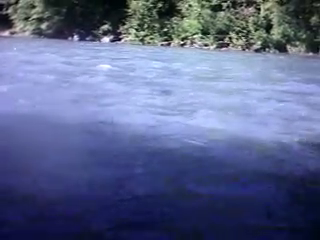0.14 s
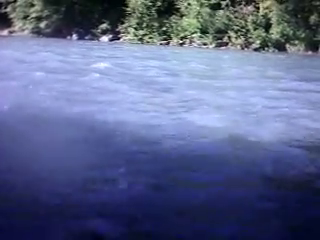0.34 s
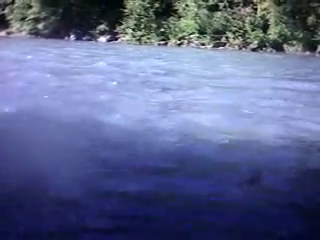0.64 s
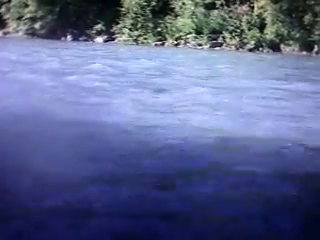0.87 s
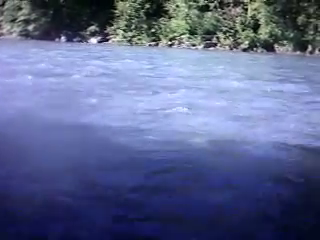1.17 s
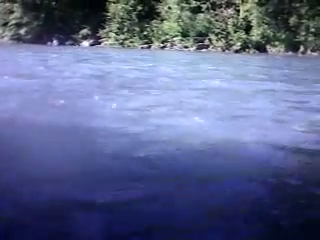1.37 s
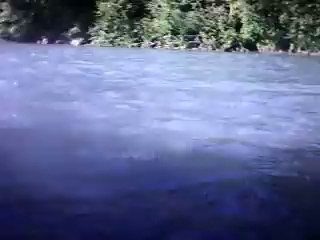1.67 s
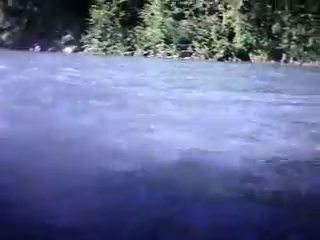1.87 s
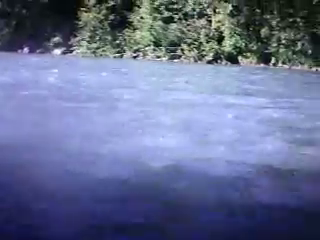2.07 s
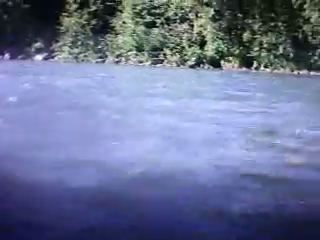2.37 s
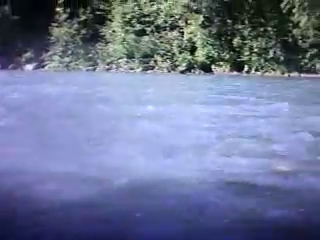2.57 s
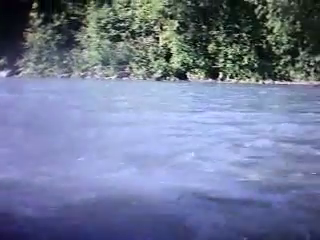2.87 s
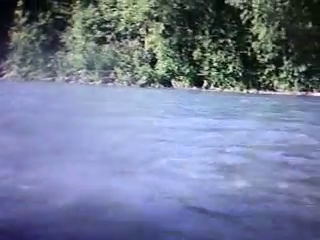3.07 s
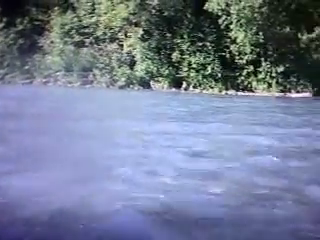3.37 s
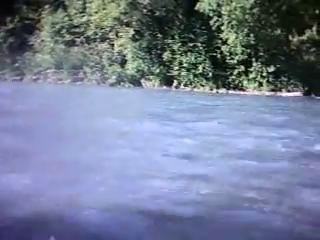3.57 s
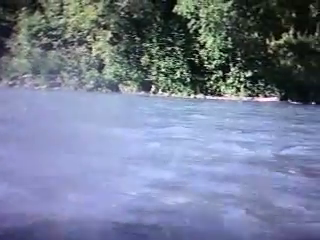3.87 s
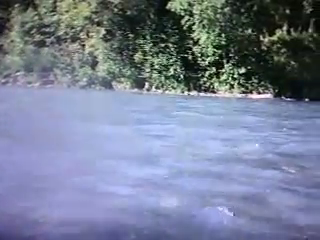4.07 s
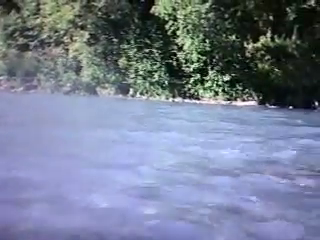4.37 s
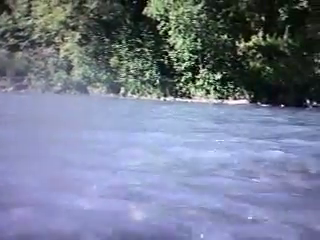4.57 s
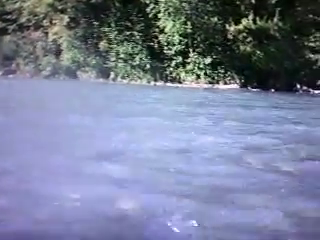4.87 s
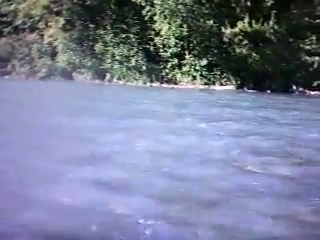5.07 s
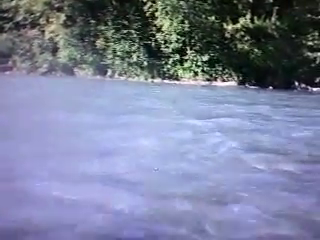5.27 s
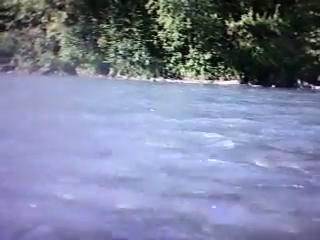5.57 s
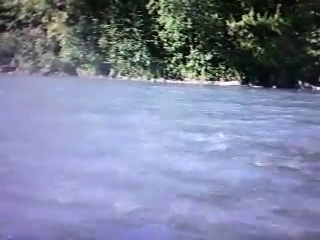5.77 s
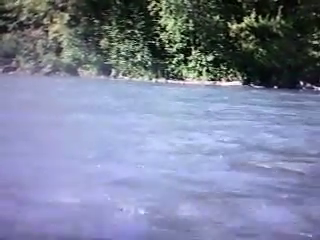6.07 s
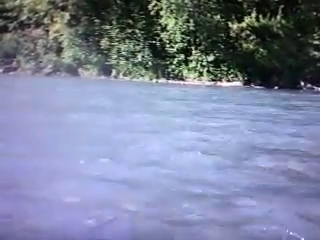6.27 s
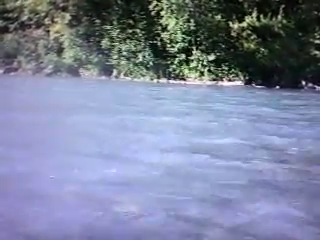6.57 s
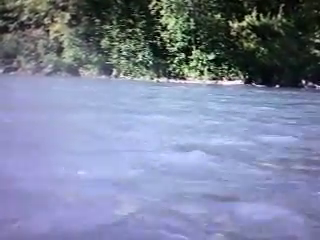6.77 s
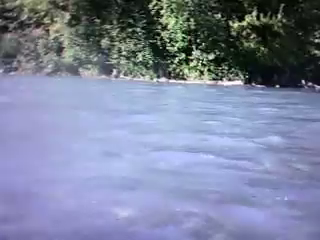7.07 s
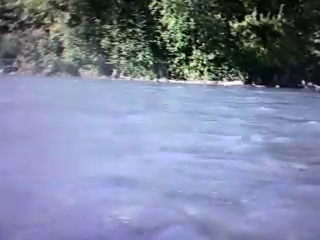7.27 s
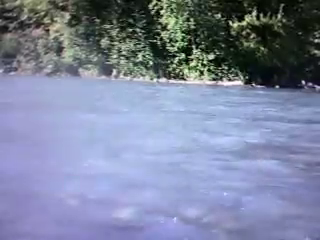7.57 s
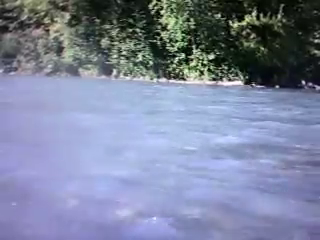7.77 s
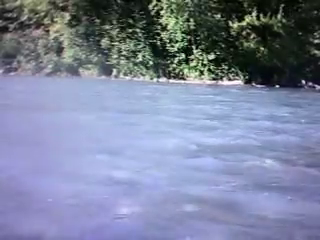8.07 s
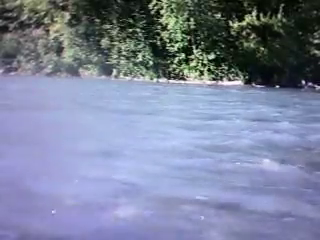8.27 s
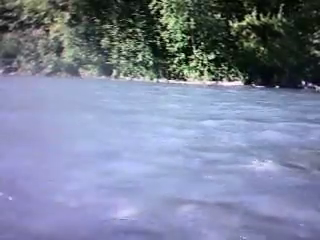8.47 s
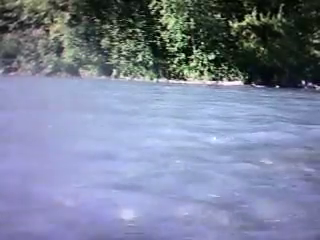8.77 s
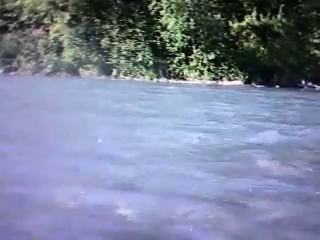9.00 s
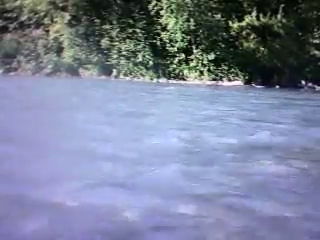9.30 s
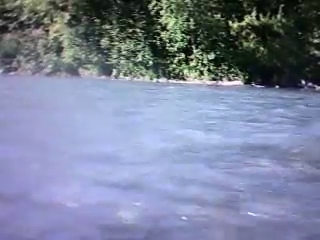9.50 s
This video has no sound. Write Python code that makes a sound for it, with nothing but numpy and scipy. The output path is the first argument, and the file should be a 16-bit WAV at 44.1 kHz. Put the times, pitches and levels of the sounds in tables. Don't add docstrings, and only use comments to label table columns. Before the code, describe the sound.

Heard from inside a closed plastic case strapped to a quad bike in a river: throttle blips make a coarse, overloaded low buzz and machine-gun rattle, broken by sharp knocks. Near five seconds the throttle shuts and the engine drops to a slow, thudding idle, with a few soft hollow bumps and faint muffled water hiss. Dull, narrow-band sound.

```python
import sys
import numpy as np
from scipy import signal
from scipy.fft import rfft, irfft
from scipy.io import wavfile
from scipy.ndimage import uniform_filter1d

SR = 44100
rng = np.random.default_rng(int(sys.argv[2]) if len(sys.argv) > 2 else 0)


def int16_out(signal):
    q = np.round(np.clip(np.atleast_2d(signal).T, -1, 1) * 32767)
    wavfile.write(sys.argv[1], SR, q.astype(np.int16))


def natural_amplitude(level_db):
    exponent = np.asarray(level_db, float) / 20
    return 10 ** exponent


N = 425124

# opens t/s, closes t/s, rattle level/dB, mount buzz reached f/Hz
THROTTLE_BLIPS = [(-0.2, 0.222, -18, 77.3), (0.584, 0.776, -29.5, 68.9), (1.083, 1.445, -18.5, 76.8),
                  (1.462, 1.472, -18, 72), (1.735, 2.032, -17.5, 76.62), (2.03, 2.199, -26.5, 80.53),
                  (2.199, 2.408, -22.5, 76.33), (2.528, 2.7, -20, 79.5), (2.7, 2.82, -25.5, 72.18),
                  (3.088, 3.206, -15.5, 74.17), (3.376, 3.41, -23.5, 67.25), (3.518, 3.581, -30.5, 67.15),
                  (3.59, 4.359, -18.5, 80.2), (4.357, 4.462, -17.5, 86.03), (4.46, 4.6, -22.5, 79.06),
                  (4.597, 4.709, -20, 67.95), (4.71, 4.755, -29, 64.32)]
# t/s, firing rate f/Hz
IDLE_DRIFT = [(5.4, 11.0), (5.84, 11.2), (6.26, 10.78), (6.7, 10.8), (7.1, 10.55), (7.52, 10.93),
              (8.36, 10.83), (9.2, 10.78), (9.64, 10.9)]
# t/s, frame level/dB, ringing case level/dB
ENGINE_LEVELS = [
    (0.0, -23.5, -30.5),
    (3.5, -20.5, -31.5),
    (4.7, -21.5, -25.5),
    (5.0, -27.5, -36.5),
    (5.45, -27.5, -38),
    (6.0, -31.5, -42),
    (7.7, -32.5, -44),
    (8.3, -31.5, -41),
    (9.64, -33, -40),
]
# multiple of the idle firing rate, level/dB
FIRING_HARMONICS = [(1, -40), (2, -26), (3, -4), (4, -11.5), (5, 4), (6, -5.5), (7, -12.5), (8, 0.5),
                    (9, -6.5), (10, -14), (11, -2), (12, -7.5), (13, -12), (14, -13.5), (15, -15),
                    (16, -30), (17, -13), (18, -17), (19, -23), (20, -17.5), (21, -17.5), (22, -25),
                    (23, -16), (24, -18.5)]
# f/Hz, width f/Hz, level/dB
FRAME_MODES = [(39.2, 1.8, 8.5), (54.8, 5, 6.5), (87, 15, -2.5), (123.5, 16, -6.5), (151, 24, -16.5),
               (201, 16, -21.5), (238, 15, -21)]
# f/Hz, width f/Hz, level/dB
CASE_MODES = [(254, 114, -2), (423, 165, -5.5), (519, 140, -7.5), (704, 40, -42), (781.5, 83, 5),
              (903, 61, -10.5), (1008, 52, 3), (1107, 117, 4), (1180.6, 88, -2.5), (1278, 90, -45),
              (1410, 61, -37.5), (1557, 66, -11)]
# f/Hz, width f/Hz, level/dB
TAPPED_MODES = [(1186, 110, 1.5), (1562, 68, -11.5)]
# f/Hz, width f/Hz, level/dB
STRUCK_MODES = [(798, 45, -18.5), (939, 130, -8), (1107.5, 118, 1.5), (1288, 34, -12.5), (1440, 145, -14)]
# f/Hz, width f/Hz, level/dB
EDGE_MODES = [(2125, 227, -1.5), (3640, 6600, -8.5)]
# f/Hz, width f/Hz, level/dB
LID_MODES = [(318, 104, -0.5), (624, 680, -2)]
# f/Hz, width f/Hz, level/dB
BRACKET_MODES = [(2350, 5, -9), (3150, 9, -14)]
# f/Hz, level per Hz/dB
RIVER_COLOUR = [(700, -24.5), (1500, 6), (1900, -8), (2600, -7), (3400, -13.5), (4200, -11.5)]
# t/s, edge level/dB, ring level/dB
CASE_KNOCKS = [(0.2826, -17, -6.5), (0.3412, 3, -7.5), (0.4666, -14, -6.5), (0.5317, 7.5, -2.5),
               (0.5899, -24, -1), (0.649, 13.5, 6), (0.7681, -6, -3), (0.819, -8, -1), (0.8615, -24, -10.5),
               (0.9447, -17, 0), (1.0127, -16, -9), (1.0325, 3, -6.5), (1.0683, -21, 2), (1.49, -13, -4),
               (1.5142, -25, -14.5), (1.5926, -15.5, -0.5), (1.6082, 3, -6.5), (1.734, -6, -7),
               (2.4698, -20, -12), (2.4972, -13, 5.5), (2.9637, -10, -17), (3.0277, -21, -4.5),
               (3.0546, -28, 1), (3.2565, -14, 1), (3.323, 6.5, -4), (3.4434, 1, -7),
               (5.3651, -16.5, -21.5), (5.706, 0, 2), (5.7334, -14, -13), (8.719, -25, -16)]
# t/s, upper modes level/dB, lower modes level/dB
MOUNT_BUMPS = [(4.8348, -5.5, -15), (4.8655, -27, -19), (4.9873, -11.5, -15.5), (5.0498, -21, -16),
               (5.1433, -19.5, -18.5), (5.2899, -12, -14), (5.3731, -7.5, -13.5), (5.393, -14, -12.5),
               (5.5468, -28, -29), (5.6997, 8.5, -7.5), (5.7092, 1, -27), (5.7244, 1, -12),
               (5.7394, -5.5, -19), (7.5088, -18, -36), (7.7715, -12.5, -15.5), (8.0313, -18.5, -25.5),
               (8.334, -18, -23), (8.3526, -14, -19.5), (8.7124, 5.5, -10), (8.7235, -20, -17),
               (8.7538, -14, -16.5), (9.0468, -20, -23), (9.0764, -27, -28)]

COAST_HZ, IDLE_HZ = 64.89, 10.82
BUZZ_ORDER = 4
LOOSE_DB, SHUT_DB = -33, -40
THROTTLE_FIRE_S, IDLE_FIRE_S = 3.957, 6.857
FULL_SCALE = .715


def curves(table):
    s, *columns = np.transpose(table)
    return [np.interp(np.arange(N) / SR, s, c) for c in columns]


def level(x, db):
    return x * natural_amplitude(db) / np.sqrt(np.mean(x ** 2))


def lag(x, seconds):
    keep = np.exp(-1 / (seconds * SR))
    return signal.lfilter([1 - keep], [1, -keep], x - x[0]) + x[0]


def walk(rate):
    hold = int(SR / rate)
    steps = np.repeat(rng.standard_normal(N // hold + 1), hold)
    return 1.3 * uniform_filter1d(steps, hold)[:N]


def ring(x, modes):
    return sum(natural_amplitude(db) * signal.lfilter(*signal.iirpeak(hz, hz / width, SR), x) for hz, width, db in modes)


def case(x, modes=CASE_MODES):
    return sum(ring(ring(x, [(hz, width, 0)]), [(hz, width, db)]) for hz, width, db in modes)


def bursts(starts, sizes, seconds):
    clicks = np.zeros(N)
    clicks[starts] = sizes
    return signal.lfilter([1], [1, -np.exp(-1 / (seconds * SR))], clicks) * rng.standard_normal(N)


def throttle():
    t = np.arange(N) / SR
    buzz_hz, rattle_db = np.full(N, 1. * COAST_HZ), np.full(N, 1. * SHUT_DB)
    for opens, closes, db, top_hz in THROTTLE_BLIPS:
        buzz_hz[max(int(opens * SR), 0):int(closes * SR)] = top_hz
        corners = [opens - 0.01, opens, closes, closes + 0.006, closes + 0.11]
        rattle_db = np.maximum(rattle_db, np.interp(t, corners, [SHUT_DB, db, db, LOOSE_DB, SHUT_DB]))
    settle_s, flywheel_s = 0.22, 0.045
    driving = np.exp(-np.maximum(t - THROTTLE_BLIPS[-1][1], 0) / settle_s)
    idle_hz, = curves(IDLE_DRIFT)
    driven_hz = lag(buzz_hz, flywheel_s) / BUZZ_ORDER
    return idle_hz + driving * (driven_hz - idle_hz), rattle_db


def engine(hz):
    frame_db, case_db = curves(ENGINE_LEVELS)
    turns = np.cumsum(hz) / SR
    turns -= turns[int(IDLE_FIRE_S * SR)]
    start = rng.random(len(FIRING_HARMONICS))
    order, order_db = np.transpose(FIRING_HARMONICS)

    def passed(k):
        db = np.interp(k * hz[::16] / IDLE_HZ, order, order_db) + walk(11)[::16]
        return np.repeat(natural_amplitude(db), 16)[:N]

    beat = sum(passed(k) * np.sin(2 * np.pi * (k * turns + p)) for k, p in zip(order, start))
    slosh = ring(natural_amplitude(1.8 * walk(12)) * rng.standard_normal(N), FRAME_MODES)
    slosh = signal.sosfilt(signal.butter(4, 300, fs=SR, output="sos"), slosh)
    frame = level(beat, -1.5) + level(slosh, -5.5)
    throb = 1 + 0.8 * np.exp(3.5 * (np.cos(2 * np.pi * (turns - .05)) - 1))
    shake = case(throb * natural_amplitude(1.5 * walk(70)) * rng.standard_normal(N))
    fires = np.flatnonzero(np.diff(np.floor(turns)))
    taps = bursts(fires, natural_amplitude(rng.standard_normal(len(fires))), seconds=0.0015)
    ticks = case(taps, TAPPED_MODES)
    return natural_amplitude(frame_db + 9.0) * frame + natural_amplitude(case_db + 8.5) * (level(shake, 0) + level(ticks, -8))


def beats(hz, jitter):
    turns = np.cumsum(hz) / SR
    last = int(turns[-1])
    stretch = rng.standard_normal(last + 2)
    starts = np.searchsorted(turns, np.arange(1, last) + jitter * stretch[1:last])
    return turns, np.unique(np.clip(starts, 0, N - 1))


def strike(hits, edge, thump):
    return ring(hits, STRUCK_MODES) + ring(edge, EDGE_MODES) + ring(thump, LID_MODES) + ring(edge, BRACKET_MODES)


def mount(firing_hz, rattle_db):
    buzz_db = -15 + 0.74 * (lag(rattle_db, 0.017) + 19)
    fade = np.interp(np.arange(N) / SR, [4.78, 4.98], [1, 0])
    turns, slams = beats(2 * BUZZ_ORDER * firing_hz, jitter=0.22)
    swing = np.sqrt(2) * np.sin(np.pi * turns - .6) * natural_amplitude(buzz_db + 5.5 + 1.5 * walk(30))
    reach_db = rattle_db + 2.5 * np.minimum(rattle_db + 28, 0)
    half_swings = np.round(turns[slams])
    upswing = half_swings % 2 == 0
    scatter_db = 4.5 * rng.standard_normal(len(slams))
    first = 2 * np.round(turns[int(THROTTLE_FIRE_S * SR)] / 2)
    firings = (half_swings - first) / (2 * BUZZ_ORDER)
    since = firings % 1
    weak = rng.exponential(size=400)[np.floor(firings).astype(int)]
    kick_db = 15 * (1 / 3 - since ** 2) - 2 * (weak - 1)
    short = rng.random(2000)[np.floor(BUZZ_ORDER * firings).astype(int)] < 0.4 * since ** 3
    sizes = natural_amplitude(-14 * short + reach_db[slams] + scatter_db + kick_db + 7.3 * upswing)
    hits = bursts(slams, sizes, seconds=0.0019)
    return fade * (swing + strike(natural_amplitude(35.5) * hits, natural_amplitude(22.0) * hits, natural_amplitude(29.5) * hits))


def river():
    hz, db = np.transpose(RIVER_COLOUR)
    colour = natural_amplitude(np.interp(np.log(np.fft.rfftfreq(N, 1 / SR) + 1), np.log(hz), db))
    splashes = natural_amplitude(0.85 * walk(22)) * rng.standard_normal(N)
    return level(irfft(colour * rfft(splashes), N), -44.5)


def blows(s, push_ms, click):
    span = np.arange(1500)
    fade = np.exp(-span / (np.clip(push_ms, .3, 12)[:, None] * SR / 1000))
    push = fade * rng.standard_normal((len(s), len(span)))
    push[:, 0] = click
    push /= np.sqrt(np.sum(push ** 2, axis=1, keepdims=True))
    return ((s * SR).astype(int)[:, None] + span).ravel(), push


def place(at, push, db):
    return np.bincount(at, (natural_amplitude(db)[:, None] * push).ravel(), N)[:N]


def knocks():
    s, edge_db, ring_db = np.transpose(CASE_KNOCKS)
    bounce_s, bounce_db, scatter_db = 0.014, -11.5, 11.5
    chance = rng.random((len(s), 6))
    later = np.c_[0 * s, np.cumsum(bounce_s * (.5 + chance[:, :3]), axis=1)]
    softer_db = np.c_[0 * s, np.cumsum(bounce_db + scatter_db * (2 * chance[:, 3:] - 1), axis=1)]
    s = (s[:, None] + later).ravel()
    edge_db = (edge_db[:, None] + softer_db).ravel()
    ring_db = (ring_db[:, None] + softer_db).ravel()
    at, push = blows(s, np.full(len(s), 1.2), click=3.08)
    hits, edge = place(at, push, ring_db), place(at, push, edge_db)
    hits = signal.sosfilt(signal.butter(2, 1700, fs=SR, output="sos"), hits)
    return strike(natural_amplitude(37.5) * hits, natural_amplitude(21.5) * edge, natural_amplitude(30.5) * hits) + case(natural_amplitude(30.5) * hits)


def bumps():
    s, upper_db, lower_db = np.transpose(MOUNT_BUMPS)
    at, push = blows(s, np.full(len(s), 10.2), click=0.83)
    upper, lower = place(at, push, upper_db), place(at, push, lower_db)
    return case(natural_amplitude(34.5) * upper, CASE_MODES[5:]) + case(natural_amplitude(41.5) * lower, CASE_MODES[:5])


def scene():
    firing_hz, rattle_db = throttle()
    return (engine(firing_hz) + mount(firing_hz, rattle_db) + river() + knocks() + bumps())[None]


def band_limit(x):
    return signal.sosfilt(signal.butter(12, 15900, fs=SR, output="sos"), x)


def record(dry):
    stage = dry[0] / (1 + np.abs(dry[0] / 0.55) ** 5) ** (1 / 5)
    stage = signal.lfilter(*signal.butter(1, 52, "high", fs=SR), stage)
    stage = signal.sosfilt(signal.butter(2, 22, "high", fs=SR, output="sos"), stage)
    stage = stage + 0.099 * stage ** 2
    slow = np.clip(signal.resample_poly(stage, 80, 441), -FULL_SCALE, FULL_SCALE)
    smooth = signal.firwin(32 * 441 + 1, .985 / 441, window=("kaiser", 9.))
    fast = signal.resample_poly(slow, 441, 80, window=smooth)[:N]
    return band_limit(np.clip(fast, -FULL_SCALE, FULL_SCALE)[None])


dry = scene()
out = record(dry)
int16_out(out)
```